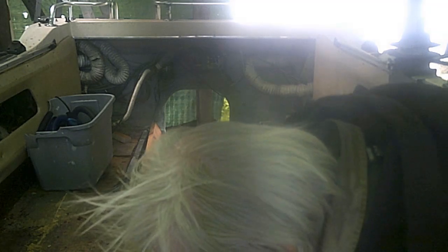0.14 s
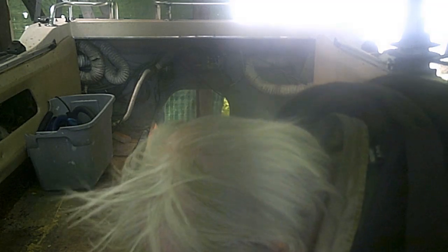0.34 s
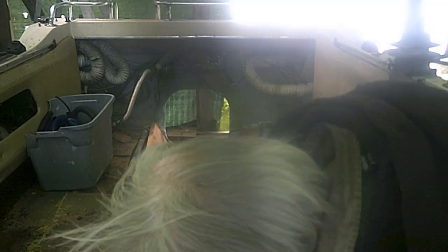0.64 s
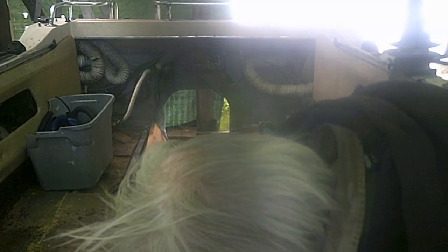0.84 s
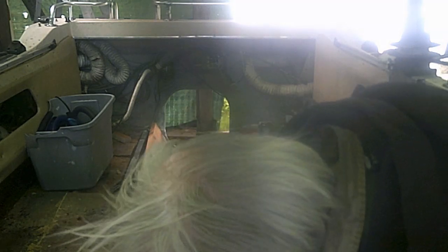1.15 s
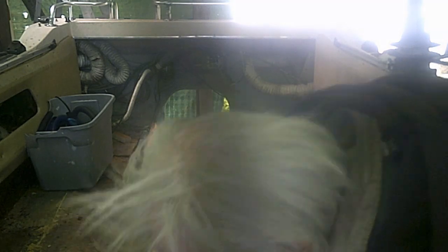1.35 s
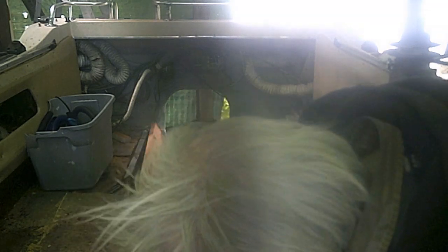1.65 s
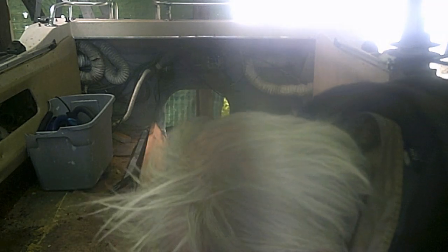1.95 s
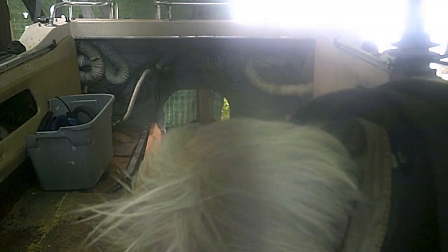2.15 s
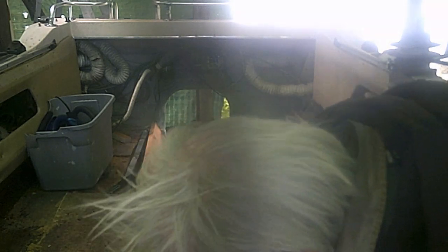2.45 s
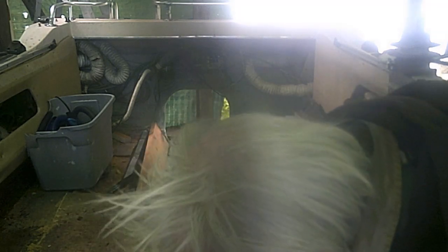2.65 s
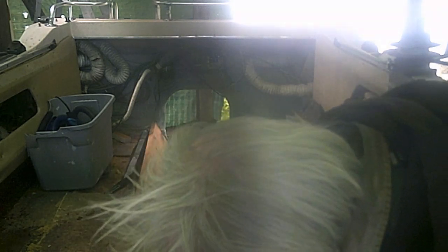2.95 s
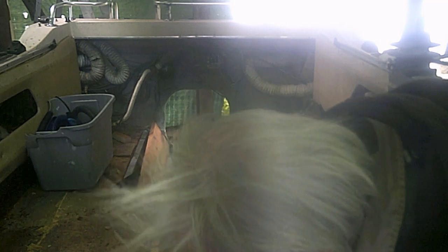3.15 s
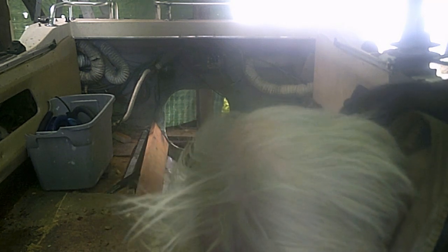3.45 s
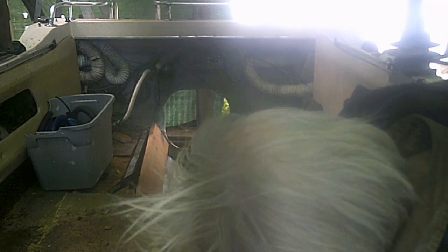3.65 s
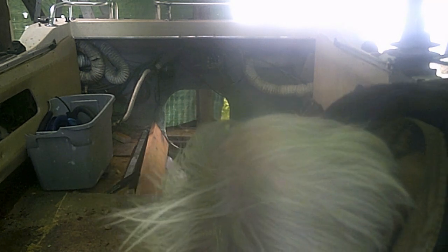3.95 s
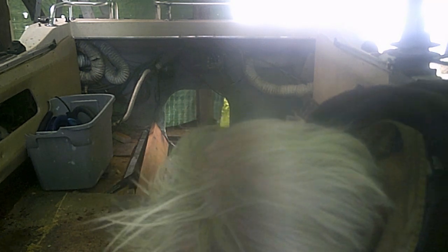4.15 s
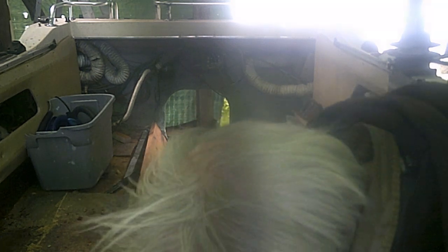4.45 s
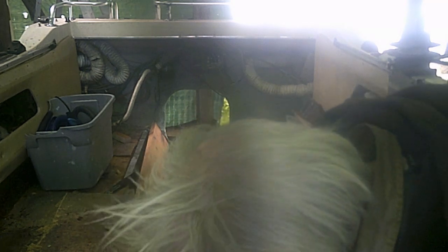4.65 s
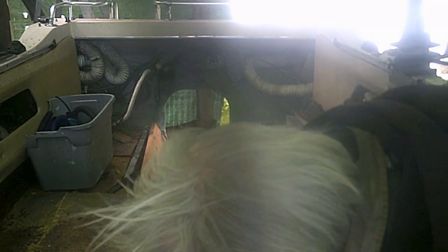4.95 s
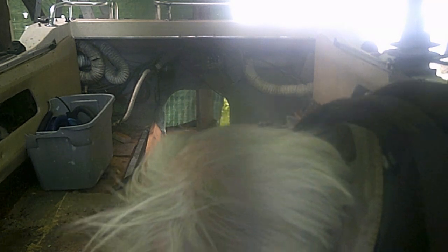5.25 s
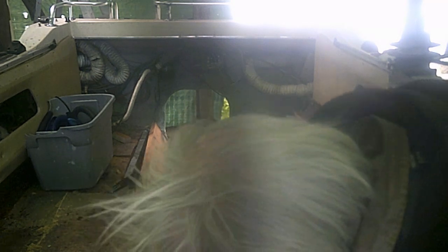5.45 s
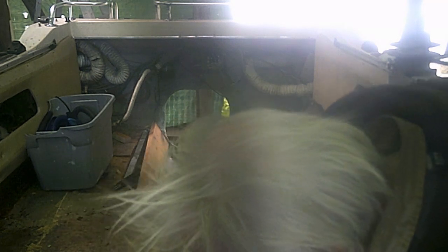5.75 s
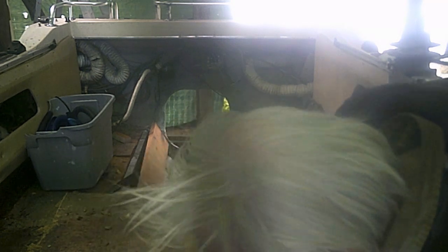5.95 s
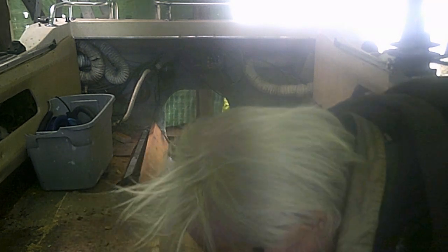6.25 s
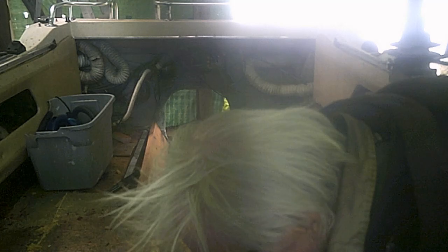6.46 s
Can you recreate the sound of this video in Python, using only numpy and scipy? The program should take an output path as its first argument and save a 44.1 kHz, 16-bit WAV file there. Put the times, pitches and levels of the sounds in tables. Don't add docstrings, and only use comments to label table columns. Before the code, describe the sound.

Plywood and fiberglass crack, crunch and tear in bursts as a boat floor is pried up, with panel thumps over a low motor hum.

```python
import sys
import numpy as np
from scipy import signal
from scipy.io import wavfile
from scipy.ndimage import uniform_filter1d, minimum_filter1d

SR = 44100
rng = np.random.default_rng(int(sys.argv[2]) if len(sys.argv) > 2 else 0)


def unload_audio(sound):
    columns = np.transpose(np.atleast_2d(sound))
    steps = np.round(np.clip(columns, -1, 1) * 32767)
    wavfile.write(sys.argv[1], SR, steps.astype(np.int16))


def decibels_to_gain(level_db):
    exponent = np.asarray(level_db, float) / 20
    return 10 ** exponent


N = 290619
CONTROL_STEP = 64

# pitch_hz, level_db per Hz
FIBRE_TONE = [(300, -23.5), (520, -16.5), (700, 2.5), (860, -3.5), (1030, 1), (1250, -4), (1450, 0.5),
              (1900, -4), (2300, 1.5), (3500, 6), (8000, -11.5)]
# pitch_hz, width_hz, level_db
SHEET_MODES = [(680, 21, -5.5), (1074, 58, 0.5), (1480, 49, -17.5), (1949, 74, 3), (1950, 17, -18.5),
               (2850, 360, -13), (3410, 52, -16.5)]
# pitch_hz, width_hz, level_db
PANEL_MODES = [(179.2, 37, -6), (226, 6.1, 2.5), (292, 200, -1.5), (352.2, 140, -6), (440.7, 37, -8),
               (835, 67, -12)]


def evened(x):
    return x / np.sqrt(np.mean(x ** 2) + 1e-20)


def read(points, hz):
    f, value = np.transpose(points)
    return np.interp(np.log(hz + 1), np.log(f + 1), value)


def curves(rows):
    s, *columns = np.transpose(rows)
    return [np.interp(np.arange(N) / SR, s, c) for c in columns]


def sampled(x):
    return np.interp(np.arange(N) / CONTROL_STEP, np.arange(len(x)), x)


def swell(s, hold, db, rise, fall):
    t = np.arange(0, N + CONTROL_STEP, CONTROL_STEP) / SR
    away_db = rise * np.maximum(s - t, 0) + fall * np.maximum(t - s - hold, 0)
    return decibels_to_gain(db - away_db) ** 2


def add(mix, s, sound):
    part = mix[round(s * SR):][:len(sound)]
    part += sound[:len(part)]


def resonate(x, hz, width):
    turn = np.exp(2j * np.pi * np.cumsum(hz * np.ones(len(x))) / SR)
    r = np.exp(-np.pi * width / SR)
    return 2 * (turn * signal.lfilter([1 - r], [1, -r], x / turn)).real


def body(x, modes):
    return sum((-1) ** k * decibels_to_gain(db) * resonate(x, hz, width) for k, (hz, width, db) in enumerate(modes))


def near_modes(modes, hz):
    db_per_octave = 12.5
    return [(f, width, db - db_per_octave * abs(np.log2(f / hz))) for f, width, db in modes]


def causal(points):
    hz = abs(np.fft.fftfreq(4096, 1 / SR))
    gain = np.log(decibels_to_gain(np.maximum(read(points, hz), -100)))
    taps = np.fft.ifft(np.exp(gain - 1j * signal.hilbert(gain).imag)).real[:2048]
    return taps / np.linalg.norm(taps)


def wander(span):
    size = round(span * SR)
    return evened(uniform_filter1d(uniform_filter1d(rng.standard_normal(N), size), size))


def grit(per_s, spread_db):
    size_db = spread_db * np.minimum(rng.exponential(1, N), 4)
    size = decibels_to_gain(size_db) * rng.choice([-1, 1], N)
    return size * (rng.random(N) < per_s / SR)


def prying():
    # start_s, hold_s, tearing_db, sheet_ring_hz, glass_over_wood_db
    heaves = [(0.345, 0.05, -44, 1304, 5.5), (0.39, 0.12, -45, 1158, -6), (0.569, 0.041, -31, 1900, -5),
              (0.978, 0.051, -45, 2060, 15), (1.031, 0.08, -29, 1920, 18), (1.145, 0.15, -18.5, 1418, 13),
              (1.387, 0.059, -33, 2266, 16), (1.625, 0.05, -41.5, 1387, -16),
              (1.691, 0.14, -31, 1477, -1.5), (1.959, 0.07, -54.5, 1265, -12),
              (2.221, 0.09, -39, 1178, -23), (2.802, 0.042, -40, 1860, 15.5), (2.898, 0.09, -18, 1933, 7.5),
              (2.997, 0.065, -30, 2280, 8.5), (3.185, 0.06, -26, 2300, 9.5), (3.266, 0.18, -32, 1600, 17),
              (3.629, 0.30, -36.5, 1480, 0), (4.26, 0.055, -33, 1570, 5), (4.756, 0.25, -50.5, 1244, 5.5),
              (5.201, 0.093, -32, 2253, 15.5), (5.357, 0.13, -27.5, 2270, 13),
              (5.958, 0.072, -43.5, 1384, -5), (6.078, 0.15, -41.5, 1690, -7),
              (3.505, 0.092, -39.5, 2090, 1)]
    rise_db_per_s, fall_db_per_s = 499, 291.5
    rest_db, rest_hz, rest_glass_db = -56, 1260, 9.5
    rows = np.array(heaves)
    power = np.array([swell(s, hold, db, rise_db_per_s, fall_db_per_s) for s, hold, db in rows[:, :3]])
    rest = decibels_to_gain(rest_db) ** 2
    wood = rest + power.sum(0)
    glass = rest * decibels_to_gain(rest_glass_db) ** 2 + decibels_to_gain(rows[:, 4]) ** 2 @ power
    ring_hz = (rest * rest_hz + rows[:, 3] @ power) / wood
    return sampled(np.sqrt(wood)), sampled(ring_hz), sampled(np.sqrt(glass))


def tearing():
    wood, ring_hz, glass = prying()
    clumps = decibels_to_gain(3.2 * wander(.008))
    fibres = signal.oaconvolve(clumps * grit(2500, 3.2), causal(FIBRE_TONE))[:N]
    ring = .25 * evened(resonate(fibres, ring_hz, 260))
    sheet = 0.49 * evened(fibres) + 0.25 * evened(body(fibres, SHEET_MODES)) + ring
    treble = signal.butter(2, 2600, "high", fs=SR, output="sos")
    strands = signal.sosfilt(treble, clumps * grit(5000, 5.8))
    return decibels_to_gain(-0.5) * wood * evened(sheet) + glass * evened(strands)


def snaps():
    # start_s, peak_db, ring_hz,
    # dying_s
    cracks = [(1.0979, -6, 1720, 0.31), (1.1474, -8, 1410, 0.06), (1.2454, -4, 1670, 0.027),
              (1.2609, 9.5, 975, 0.073), (1.3169, 4.5, 710, 0.066), (1.3494, -2.5, 2320, 0.05),
              (1.3867, -11, 2360, 0.034), (1.4295, 3.5, 2280, 0.043), (1.8255, -16.5, 2300, 0.041),
              (2.2807, -13.5, 713, 0.043), (2.7984, -27, 2460, 0.088), (2.835, -16, 1850, 0.091),
              (2.9994, -9.5, 2140, 0.046), (3.0604, -6.5, 2340, 0.041), (3.1911, -6.5, 2655, 0.05),
              (3.2334, -25, 2280, 0.05), (3.2879, -9.5, 1500, 0.036), (3.3014, -5.5, 1600, 0.047),
              (3.3344, -19, 1480, 0.044), (3.3612, -6.5, 1550, 0.044), (3.4236, -26, 2330, 0.027),
              (3.4451, -5, 2970, 0.04), (3.7684, -19, 1550, 0.04), (3.872, -17, 1570, 0.087),
              (4.2938, -5, 1670, 0.12), (5.2106, -6.5, 2210, 0.028), (5.2909, -8.5, 2280, 0.041),
              (1.5694, -27, 1070, 0.054), (6.0517, -12.5, 2300, 0.061), (6.191, -15, 1430, 0.04)]
    # start_s, peak_db, ring_hz, dying_s
    twangs = [(0.4344, -24, 1190, 0.068), (0.4524, -19, 1192, 0.11), (0.5621, -22, 1100, 0.084),
              (0.5891, -11.5, 1030, 0.05), (0.6064, -15.5, 1610, 0.05), (1.03, -12, 1940, 0.1),
              (1.05, 0, 1954, 0.11), (1.0694, -27, 1990, 0.062), (1.1224, -14, 1480, 0.098),
              (1.1667, -10, 1470, 0.063), (1.1894, -11, 1970, 0.05), (1.2216, -6, 1440, 0.038),
              (1.703, -23, 1390, 0.12), (1.7759, -25.5, 2210, 0.086), (2.0193, -25.5, 1180, 0.086),
              (5.4136, 4.5, 2330, 0.059), (2.2503, -19.5, 1170, 0.13), (2.8928, -13, 966, 0.068),
              (2.9287, 1.5, 1900, 0.065), (2.9507, 2, 1980, 0.1), (3.0445, -18, 2300, 0.018),
              (3.1692, -22, 2220, 0.045), (3.7269, -24, 1360, 0.026), (4.2448, -25.5, 1174, 0.05),
              (4.2612, -18.5, 1130, 0.063), (5.1956, -18.5, 2360, 0.052), (5.2405, -13.5, 2110, 0.03),
              (5.3587, -8.5, 2260, 0.049), (5.4625, -14.5, 2290, 0.06), (6.188, -22, 730, 0.08)]
    rise_s = .002
    out, t, tone = np.zeros(N), np.arange(4096) / SR, causal(FIBRE_TONE)
    rows = [(*row, 0.21) for row in cracks]
    rows += [(*row, .54 - 1.32 * row[1]) for row in twangs]
    for s, db, hz, dying, share in rows:
        noise, draw = rng.random((2, 4096))
        breaks = (noise - .5) * (draw < .12)
        run = breaks * decibels_to_gain(-60 * t / max(dying, .01)) * np.minimum(t / rise_s, 1)
        broad = signal.oaconvolve(run, tone)[:len(t)]
        broad = .5 * broad + resonate(broad, hz, 1700)
        ring = resonate(resonate(broad, hz, 210), hz, 800)
        crunch = broad + body(broad, near_modes(SHEET_MODES, hz))
        share = np.clip(share, 0, .85)
        snap = (1 - share) * evened(crunch) + share * evened(ring)
        add(out, s - .001, decibels_to_gain(db) * snap / abs(snap).max())
    return out


def blows():
    # start_s, peak_db, ring_hz, length_s
    hits = [(0.435, -11, 395, 0.13), (0.472, -12, 242, 0.078), (0.573, -14.5, 283, 0.03),
            (0.59, -8.5, 313, 0.028), (1.048, -15, 362, 0.029), (1.097, -13.5, 321, 0.023),
            (1.224, -8, 326, 0.053), (1.258, 1, 336, 0.045), (1.278, -10.5, 223, 0.078),
            (1.316, -7, 610, 0.014), (1.346, -10.5, 345, 0.018), (1.435, -14.5, 332, 0.029),
            (0.662, -32, 189, 0.06), (1.839, -1.5, 320, 0.047), (1.867, -12.5, 253, 0.049),
            (2.019, -14, 308, 0.024), (2.21, -19, 401, 0.086), (2.246, -12.5, 420, 0.036),
            (2.273, -11.5, 223, 0.062), (2.891, -11, 438, 0.015), (2.93, -8, 335, 0.022),
            (2.953, -12.5, 342, 0.078), (5.409, -14.5, 300, 0.063), (3.965, 2.5, 290, 0.04),
            (4.237, -20, 403, 0.067), (4.293, -4, 267, 0.061), (5.361, -20, 448, 0.055),
            (2.069, -26.5, 189, 0.061), (4.332, -20, 203, 0.056)]
    # start_s, peak_db
    knocks = [(1.193, -16.5), (1.977, -15.5), (2.999, -19), (3.047, -21), (3.287, -18.5), (3.333, -16.5),
              (3.454, -15.5), (3.638, -19.5), (3.701, -21), (5.205, -29), (5.244, -22.5), (5.288, -22.5),
              (5.47, -29), (3.236, -23), (1.14, -39), (1.389, -20.5), (6.05, -18), (6.195, -31.5),
              (6.399, -31)]
    # start_s, peak_db, ring_hz
    shoves = [(1.767, -19.5, 190), (3.201, -14, 350), (5.558, -19, 200), (5.594, -8, 308),
              (5.97, -12.5, 303)]
    knock_hz, knock_s = 320, .035
    shove_s, shove_rise_s = .016, .012
    rise_s, hard_db = 0.0088, 11
    struck = hits + [(s, db, knock_hz, knock_s) for s, db in knocks]
    struck = [(*row, rise_s / 2 ** ((row[1] + 20) / hard_db)) for row in struck]
    return struck + [(*row, shove_s, shove_rise_s) for row in shoves]


def thumps():
    out, t = np.zeros(N), np.arange(8192) / SR
    for s, db, hz, length, rise in blows():
        noise = rng.standard_normal(8192)
        dying = decibels_to_gain(-30 * np.maximum(t - rise, 0) / max(length, .004))
        shape = dying * np.sin(np.pi / 2 * np.minimum(t / rise, 1)) ** 2
        push = uniform_filter1d(uniform_filter1d(noise, size=40), size=30) * shape
        sag_hz = hz * (.8 + .27 * np.exp(-t / .05))
        ring = resonate(resonate(push, sag_hz, 90), sag_hz, 300)
        slap = evened(resonate(resonate(noise * shape, 960, 970), 560, 1300))
        thump = 0.53 * evened(body(push, near_modes(PANEL_MODES, hz))) + 0.78 * evened(ring)
        thump = thump + 0.25 * decibels_to_gain(0.39 * db) * slap
        add(out, s - .001, decibels_to_gain(db) * thump / abs(thump).max())
    return out


def shaking():
    rest_db, levered_db = -54, 1
    rattle_db, settle_db_per_s = -13, 262
    knocks = decibels_to_gain(2.5 * wander(.015)) * grit(500, 3.5)
    after = sum(swell(s + .012, 0, db + rattle_db, 1500, settle_db_per_s) for s, db, *_ in blows())
    wood = prying()[0]
    power = decibels_to_gain(rest_db) ** 2 + sampled(after) + (decibels_to_gain(levered_db) * wood) ** 2
    strength = np.minimum(np.sqrt(power), decibels_to_gain(-24))
    return decibels_to_gain(-6.5) * strength * evened(resonate(body(knocks, PANEL_MODES[1:]), 340, 210))


def creak():
    # start_s, pitch_hz, level_db
    groan = [
        (1.566, 262.4, -21),
        (1.59, 235.5, -32),
        (1.616, 237.6, -18),
        (1.649, 226, -28.5),
        (1.675, 218, -28),
    ]
    hz, db = curves(groan)
    turn, t = 2 * np.pi * np.cumsum(hz) / SR, np.arange(N) / SR
    on = np.clip(np.minimum(t - groan[0][0], groan[-1][0] - t) / 0.0095, 0, 1)
    tone = np.sin(turn) + .06 * np.sin(2 * turn) + 0.075 * np.sin(3 * turn)
    return on * decibels_to_gain(db + 1) * tone


def hum():
    # start_s, pitch_hz, level_db
    motor = [(0.0, 96.2, -48), (0.05, 96.3, -38), (1.04, 96.3, -39), (1.49, 97.5, -41), (2.05, 97.5, -36),
             (2.9, 97.4, -35), (3.5, 98.9, -31), (4.44, 99.0, -34), (4.61, 97.4, -33), (5.89, 97.5, -32),
             (6.59, 99.2, -32)]
    # multiple of the pitch, level_db
    overtones = [(1.5, -38), (2, -21), (3, -25.5)]
    hz, db = curves(motor)
    turn = 2 * np.pi * np.cumsum(hz + 2.2 * wander(.06)) / SR
    tone = np.sin(turn)
    for multiple, level_db in overtones:
        tone = tone + decibels_to_gain(level_db + 2.5 * wander(0.071)) * np.sin(multiple * turn)
    return decibels_to_gain(db + 5.0 + 1.2 * wander(0.01)) * tone


def rumble():
    # peak_s, level_db
    surges = [(0.0, -33), (0.48, -29.5), (0.75, -27), (1.4, -36), (1.58, -32.5), (1.92, -26.5),
              (2.35, -23.5), (2.6, -33.5), (3.05, -32.5), (3.38, -33), (3.84, -31), (4.38, -24),
              (4.82, -27), (5.05, -34), (5.71, -34.5), (6.35, -31.5)]
    steady_db, rise_s, fall_s = -36, 0.069, 0.094
    bass = signal.butter(3, [16, 52], "band", fs=SR, output="sos")
    low = signal.sosfilt(bass, rng.standard_normal(N))
    t = np.arange(0, N + CONTROL_STEP, CONTROL_STEP) / SR
    surge = sum(decibels_to_gain(db) ** 2 * np.exp(-((t - s) / np.where(t < s, rise_s, fall_s)) ** 2) for s, db in surges)
    return np.sqrt(decibels_to_gain(steady_db) ** 2 + sampled(surge)) * evened(low)


def air():
    # pitch_hz, level_db per Hz
    air_tone = [(60, -17), (110, -1), (150, -13), (200, -15), (300, -23), (600, -21.5), (1200, -24),
                (2000, -31.5), (3000, -45.5), (8000, -30)]
    frames, hz = N // 256 + 5, np.fft.rfftfreq(1024, 1 / SR)
    a, b, patches = rng.standard_normal((frames, 513, 3)).T
    patches = uniform_filter1d(uniform_filter1d(patches, 10, 0), 14, 1)
    patches_db = 1.4 * evened(patches)
    z = (a + 1j * b) * decibels_to_gain(read(air_tone, hz)[:, None] + patches_db)
    return decibels_to_gain(-37) * evened(signal.istft(z, nperseg=1024, noverlap=768)[1][:N])


def hull(x):
    # pitch_hz, time to fall 60 dB in s
    echo_times = [(200, 0.16), (1000, 0.16), (3000, 0.14)]
    taps = np.zeros(SR // 2)
    at = np.arange(160, len(taps) - 20, 20)
    taps[at + rng.integers(0, 20, len(at))] = rng.choice([-1., 1.], len(at))
    hz, t, z = signal.stft(taps, SR, nperseg=256)
    dying = decibels_to_gain(-60 * t / read(echo_times, hz)[:, None])
    tail = signal.istft(z * dying, SR, nperseg=256)[1]
    return signal.oaconvolve(x, tail / np.linalg.norm(tail))[:N]


def scene():
    work = tearing() + snaps() + thumps() + shaking() + creak()
    echo = decibels_to_gain(-8.5) * hull(work)
    return (work + echo + hum() + rumble() + air())[None]


def band_limit(x):
    return signal.sosfilt(signal.butter(12, 9100, fs=SR, output="sos"), x)


def record(dry):
    # pitch_hz, level_db
    microphone = [(2400, 1), (3200, -15), (3700, -19), (4200, -32), (5000, -41.5), (6000, -39),
                  (7200, -32.5)]
    # start_s, level_db
    ticks = [
        (3.9754, -33),
        (6.2844, -13.5),
    ]
    colour = causal(microphone)
    heard = signal.oaconvolve(dry[0], colour / colour.sum())[:N]
    for s, db in ticks:
        add(heard, s, decibels_to_gain(db) * np.array([1., -.4]))
    peak = -minimum_filter1d(-abs(heard), size=301)
    heard = heard / uniform_filter1d(np.maximum(peak / 1.08, 1), size=151)
    clipped = np.clip(heard, -.99, .99)
    edge = signal.firwin(511, 7350, window=("kaiser", 9), fs=SR)
    mix = signal.oaconvolve(clipped, edge, "same")[None]
    return band_limit(mix)


dry = scene()
out = record(dry)
unload_audio(out)
```